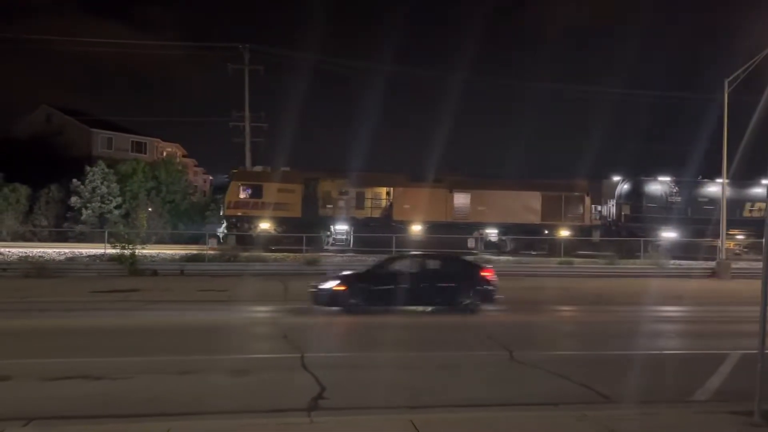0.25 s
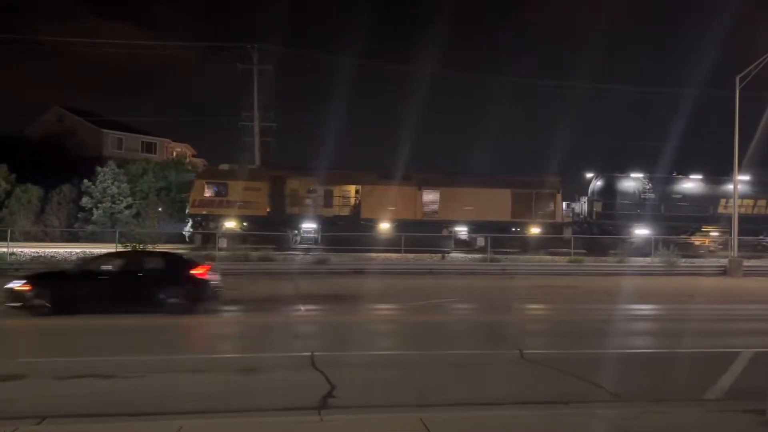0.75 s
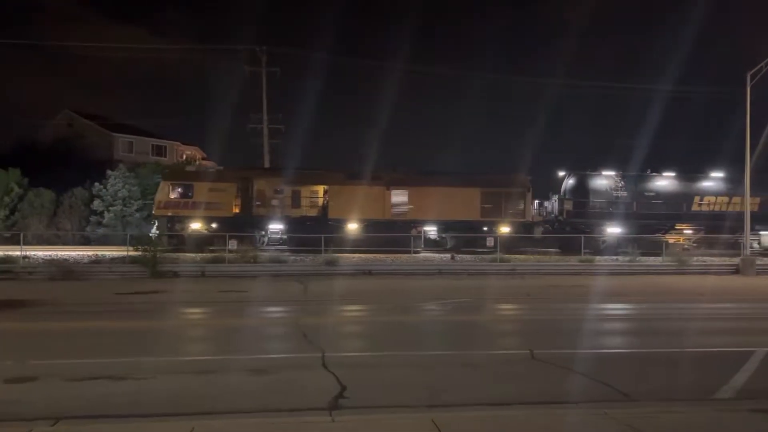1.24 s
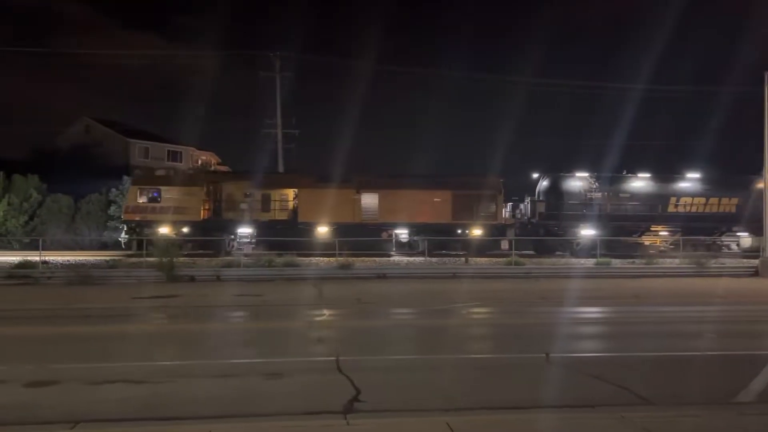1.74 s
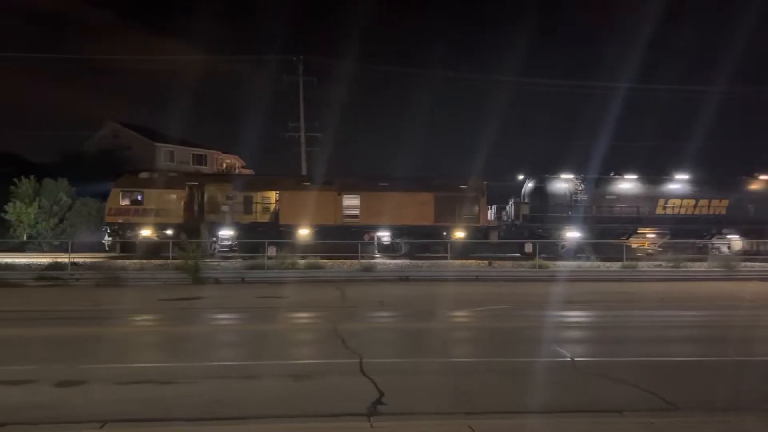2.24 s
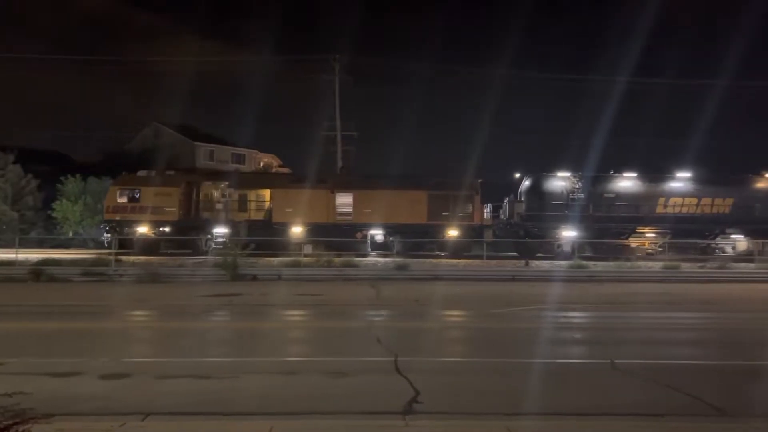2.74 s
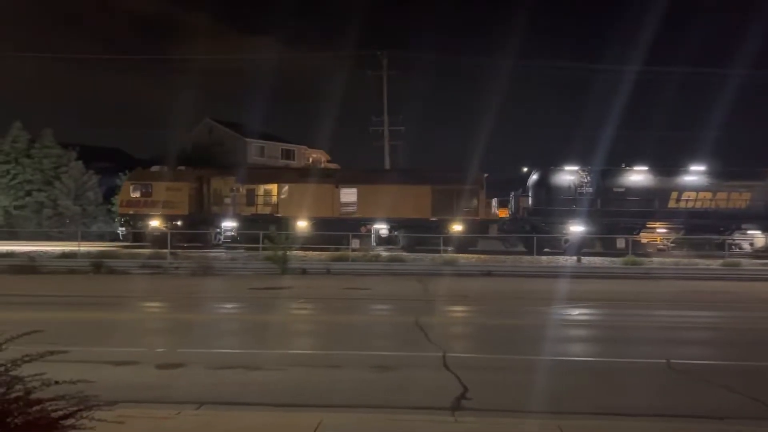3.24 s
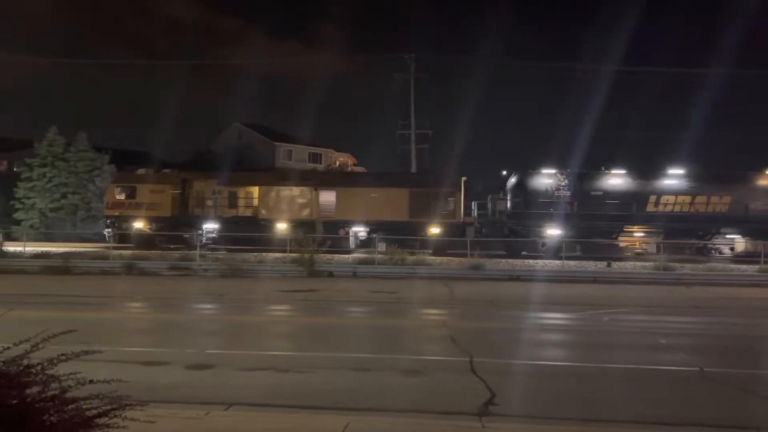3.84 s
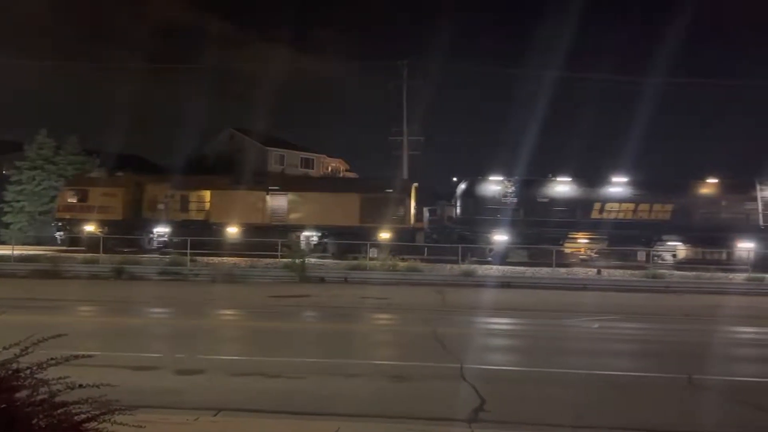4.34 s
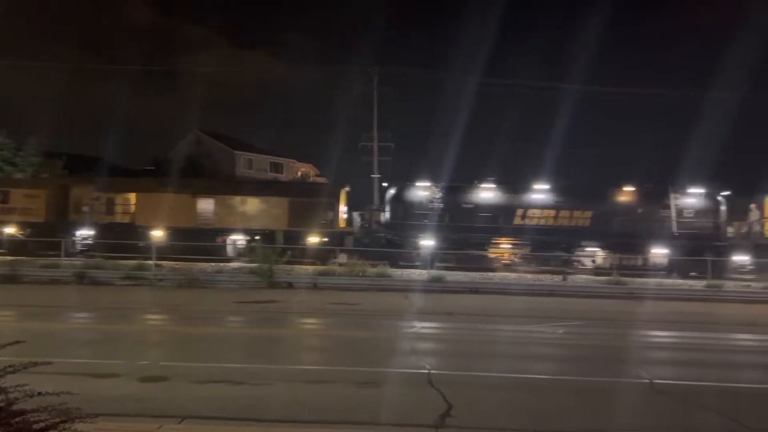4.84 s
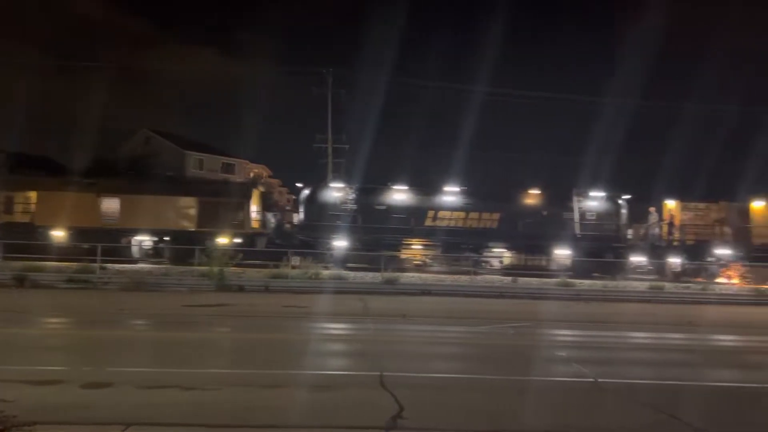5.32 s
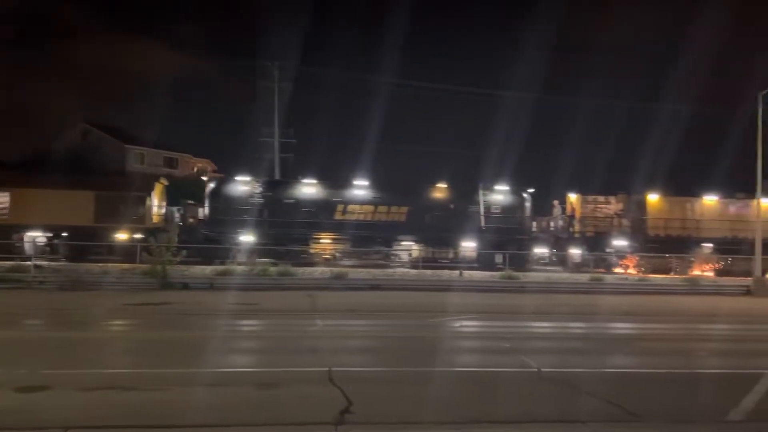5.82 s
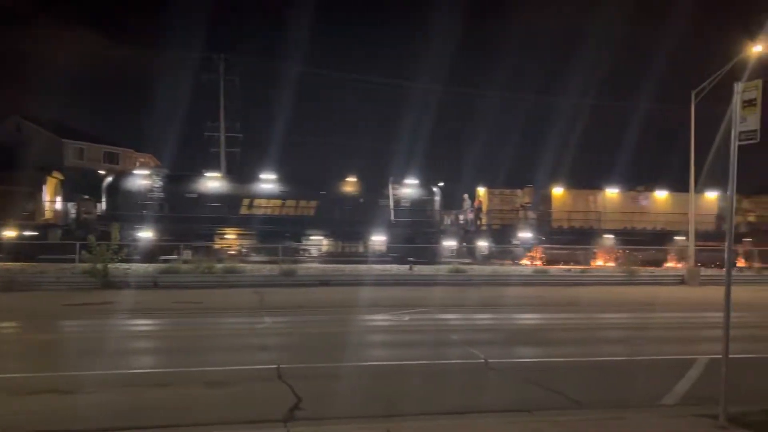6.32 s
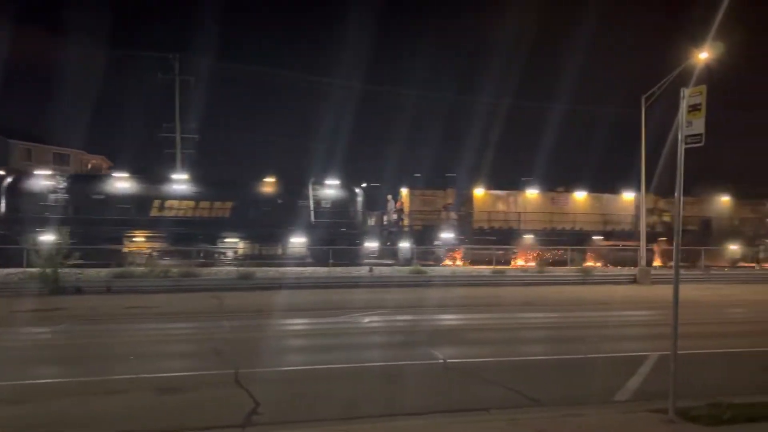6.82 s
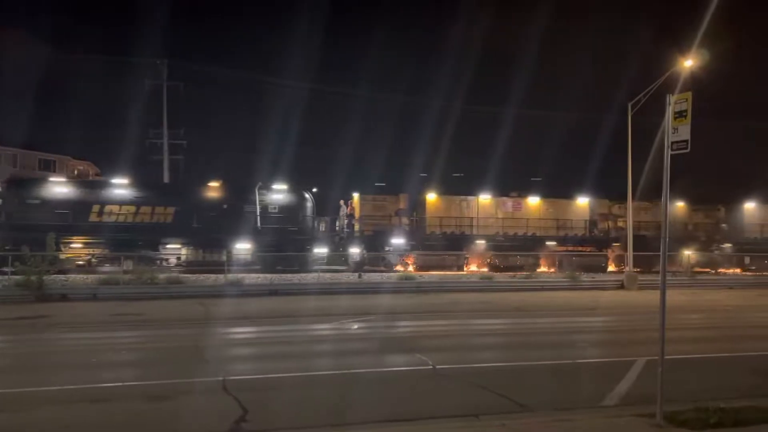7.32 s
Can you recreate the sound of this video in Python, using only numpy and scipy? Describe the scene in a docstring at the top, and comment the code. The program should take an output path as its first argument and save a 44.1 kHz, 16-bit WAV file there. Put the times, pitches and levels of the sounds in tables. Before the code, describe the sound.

Continuous loud machinery outdoors from a creeping rail grinding train: low buzzing engine hum that swells and dips, rushing broadband fan noise, and gritty steel grinding hiss with a faint mains-like buzz. A pulsing, slightly sinking gear whine sits inside the roar. The handheld stereo microphone across the road swings around after four seconds, moving fans leftward and bringing out brighter grinding, with fine hiss slowly growing to the end.

```python
"""Rail grinding train at night

A rail grinding train creeps past across a wide road from a small two-port microphone. Diesel sets drone
as wavering sines over uneven firing noise, under shaped-noise fan roar that drifts left as the microphone
turns. Stones hiss on the rails to the right as noise lines at their spin rate; a gear whine throbs."""
import sys
import numpy as np
from scipy import signal
from scipy.fft import rfft, irfft, next_fast_len
from scipy.io import wavfile
from scipy.ndimage import uniform_filter1d

SR = 44100
rng = np.random.default_rng(int(sys.argv[2]) if len(sys.argv) > 2 else 0)


def store_wav(level_fs):
    """Save 16-bit WAV to argv[1]."""
    pcm = np.round(np.clip(np.atleast_2d(level_fs), -1, 1) * 32767)
    wavfile.write(sys.argv[1], SR, pcm.T.astype(np.int16))


N = 333837
SIZE, HOP = 1024, 256  # short-time spectra, samples
HZ = np.fft.rfftfreq(SIZE, 1 / SR)[:, None]
FRAME_S = np.arange(N // HOP + 5) * HOP / SR
T_S = np.arange(N) / SR

# The microphone swings round between these times; every pair below is (before, after) the turn.
TURN_START_S, TURN_END_S = 4.08, 6.3

# Firing noise of the diesels: f/Hz, relative level/dB per Hz
RUMBLE_COLOUR = [(15, -43), (25, -25), (33, -21), (40, -10), (50, -4), (60, -13), (81, -4), (123, -7.5),
                 (160, -9), (180, -14), (216, -12), (313, -17), (340, -18.5), (385, -13.5), (479, -26.5),
                 (600, -24), (780, -57), (1320, -120)]
# Its left-right likeness: f/Hz, likeness/1
RUMBLE_LIKENESS = [(60, 0.99), (130, 0.93), (250, 0.99), (400, 0.6), (600, 0.9)]
# Share of the rumble that returns one firing cycle later: f/Hz, share/1
CYCLE_REPEAT_SHARE = [(40, .3), (70, .2), (100, .3), (200, .25), (450, .22), (700, .05)]
RUMBLE_DB = (-24, -23.5)
CYCLE_HZ = 15  # full firing cycles

# Strongest exhaust note: t/s, level/dB
DRONE_LEVEL = [(0.0, -13.5), (1.18, -15), (1.56, -22.5), (2.3, -17), (2.5, -18), (2.95, -21.5),
               (3.4, -17.5), (3.8, -16), (4.34, -21.5), (4.83, -17), (5.27, -19.5), (5.54, -25),
               (5.69, -20.5), (6.2, -23), (6.37, -34.5), (6.6, -31), (6.68, -24), (6.85, -21.5),
               (7.12, -17), (7.42, -28), (7.57, -39)]
# Its third multiple: t/s, level/dB
THIRD_LEVEL = [(0, -44.5), (.69, -29.5), (1.0, -39), (1.22, -30.5), (1.38, -44), (1.6, -30), (1.9, -33),
               (2.25, -35), (2.85, -39.5), (3.08, -29), (3.3, -25.5), (3.55, -29), (3.68, -40), (3.8, -28),
               (4.0, -32), (4.2, -48), (5.25, -32.5), (5.45, -24.5), (5.8, -29), (6.15, -43), (6.35, -28.5),
               (6.65, -36), (6.9, -35.5), (7.57, -33)]
DRONE_HZ, THIRD_HZ = 59.76, 179.3
# Exhaust notes above the strongest: f/Hz, usual level/dB
EXHAUST_NOTES = [(74.9, -28), (91, -31.5), (104.8, -32.5), (110.3, -31.5), (119.6, -31.5), (136, -39),
                 (240.4, -43.5), (254.5, -45.5), (300, -46), (316, -50.5), (359.6, -45)]
# Their swells and dips as the sets drift in and out of step: middle t/s, length/s, f/Hz, change/dB
EXHAUST_SWELLS = [(0.047, 0.29, 91, -3), (0.051, .3, 104, -17), (.05, .3, 120, -10),
                  (0.243, 0.49, 254.5, 10), (.4, 0.33, 91, 7.5), (.7, 0.36, 120, 1), (.5, 0.6, 75, 2),
                  (1.0, 0.46, 137, 6.5), (1.1, 1.5, 316, 13), (1.45, 0.28, 241, 8), (1.55, 0.13, 104, 8),
                  (1.8, 0.65, 91, 6), (1.9, 0.57, 75, 3), (2.103, 0.58, 360, 10), (2.4, 0.91, 104, 1.5),
                  (2.45, 0.43, 316, 11), (2.7, 0.55, 91, 8), (2.85, 0.45, 75, 7), (2.95, 0.27, 241, 11.5),
                  (3.298, 0.86, 360, 7), (3.5, 0.57, 120, 3), (3.6, 1.15, 110, 5.5), (3.797, 0.14, 104, 2),
                  (4.206, 0.49, 360, 8.5), (4.2, 0.36, 300, 9.5), (4.353, 0.78, 91, 8.5),
                  (4.396, 0.15, 75, -12), (4.446, 0.38, 241, 12.5), (4.49, 0.53, 137, 9),
                  (4.893, 0.17, 241, 13), (4.95, .2, 120, -18), (5.2, 0.72, 360, 6.5),
                  (5.7, 0.71, 120, 3.5), (5.8, 0.4, 91, 7), (5.832, 0.26, 241, 12.5),
                  (6.003, 0.85, 137, 7.5), (6.102, 0.11, 75, -12), (6.104, 0.54, 360, 9.5),
                  (6.5, 2.9, 254.5, 9), (6.75, 0.3, 300, 13), (6.8, 0.73, 91, 9.5), (6.898, .35, 75, -12),
                  (7.103, 0.66, 360, 7), (7.15, 0.22, 241, 13.5), (7.397, 0.36, 104, -6),
                  (7.502, 0.36, 91, -17), (7.3, 0.79, 75, 6), (7.45, .4, 120, 3), (7.45, 0.46, 137, 11)]
# Fainter notes of engines and generators: f/Hz, level/dB
FAINT_NOTES = [(44.6, -43), (150.7, -41.5), (209.9, -48), (224.8, -50), (270.5, -44.5), (405.1, -40.5),
               (470.4, -49.5)]
# Gear and motor notes from nearly straight ahead: f/Hz, level before tilt/dB
GEAR_NOTES = [(598.2, -50), (720, -47), (781.3, -48), (808, -49), (840, -50), (1120, -53), (1228, -50),
              (1260, -47), (1381, -46), (1608, -51), (1690, -50), (1715, -49), (1979, -52), (2342, -47),
              (2575, -51), (3067, -55), (4318, -57), (5836, -62), (6440, -61), (6560, -60)]
GEAR_TILT_DB_PER_OCTAVE = (-.5, 2.)

# Gear whine: t/s, level before throb/dB
WHINE_LEVEL = [(0, -45), (.3, -58), (.45, -37), (3.1, -35), (3.27, -44), (3.44, -36), (3.8, -42),
               (4.0, -61), (4.7, -49), (4.9, -43), (5.7, -43), (6.1, -56), (7.1, -42), (7.36, -44),
               (7.57, -46)]
# Unsteady tone just above it: t/s, level/dB
UPPER_TONE_LEVEL = [(0, -51), (1.1, -45), (1.6, -42), (2.5, -43), (3.2, -44), (3.8, -47), (4.1, -46),
                    (4.85, -39), (5.4, -44.5), (6.1, -41), (6.5, -48), (7.57, -44)]
WHINE_HZ, WHINE_SINK_HZ_PER_S, UPPER_TONE_HZ = 919, 1.4, 998  # sinks as its car draws level
THROB_HZ, THROB_START_S = 5.09, 1.05

# Fan roar at the right port: f/Hz, relative level/dB per Hz
FAN_COLOUR = [(300, -18), (400, -20), (520, -13.5), (700, -1), (1000, -6), (1500, -11.5), (2000, -10),
              (2400, -4), (2900, -8), (3500, -13), (4600, -22), (6300, -19.3), (6900, -28.6), (7600, -29.4)]
# Fans, left minus right, shaded by the microphone body: f/Hz, difference/dB
FAN_SHADE = [(300, -4), (400, -12), (520, -25), (700, -4.5), (1000, -3.5), (1500, -4), (2000, -2),
             (2400, -2.5), (2900, -3), (3500, -7), (4600, -14), (6300, -6.5), (6900, 2.0), (7600, 0.5)]
FAN_DB, FAN_LAG_SAMPLES = (-24.5, -23), (4.3, -9.5)  # lag: left port late
FAN_START_DB, FAN_RISE_S = -4.5, 0.45  # softer at first

# Finest hiss of the stones: f/Hz, relative level/dB per Hz
FIZZ_COLOUR = [(7000, -29.5), (7500, -23.5), (8000, -31.5), (9000, -26), (9800, -29.5), (11400, -27.5),
               (12300, -34), (13700, -32.5), (14500, -44), (15600, -34.5)]
# Its phase, left against right: f/Hz, phase/rad
FIZZ_PHASE = [(7000, -3.1), (7500, -2), (8200, 0), (9000, 0), (9700, 3.14), (10900, 3.14), (11750, 6.28),
              (13000, 6.28), (13600, 9.42), (14200, 9.42), (15200, 12.57)]
# Its left-right likeness: f/Hz, likeness/1
FIZZ_LIKENESS = [(7000, .6), (7700, .8), (8300, .97), (13000, .97), (14000, .85), (15000, .95)]
FIZZ_DB, FIZZ_GROWTH_DB_PER_S = -43.5, 0.61

# Stones on steel at the right port: f/Hz, relative level before tilt/dB per Hz
STONE_COLOUR = [(300, -8.5), (400, -12), (520, -11), (700, -13), (1000, -5), (1500, -11.5), (2000, -9.5),
                (2400, -13.5), (2900, -12), (3500, -10), (4600, -10), (6300, -11), (6900, -18), (7600, -13)]
# Stones and notes, left minus right, shaded by the microphone body: f/Hz, difference/dB
BODY_SHADE = [(300, 0.5), (400, 1.5), (520, -6), (700, -1), (1000, -1.5), (1500, 0), (2000, -3), (2400, 6),
              (2900, 0.5), (3500, -1), (4600, -12), (6300, -11), (6900, 8.5), (7600, 13.5)]
STONE_DB, STONE_TILT_DB_PER_OCTAVE = (-24, -23.5), (-2.5, -0.64)
STONE_LAG_SAMPLES = 19.35  # left port late

# Roar bands that stand out or sink as the cars move past:
# middle t/s, length/s, f/Hz, climb/Hz per s, width/Hz, lift/dB
RING_BANDS = [(0.27, 1.26, 2360, -40, 320, 8), (2.2, 4.2, 2090, 1, 420, 3), (3.9, 1.2, 2470, 20, 200, 2.5),
              (5.96, 0.48, 2440, 40, 190, 5), (6.84, 2.4, 2490, 38, 180, 5), (1.6, 0.89, 2340, -40, 290, 3),
              (3.7, 0.74, 2270, 1, 120, 4.5), (5.1, 0.73, 1690, 32.5, 39, 5), (3.3, 1.1, 1680, 1, 66, 6),
              (5.56, 0.28, 810, 3, 110, 8.5), (7.5, 1.4, 2250, 1, 440, 1), (6.3, 0.46, 790, 1, 81, 2.5),
              (2.2, 3.3, 1630, 5, 140, 4), (4.9, 1.7, 1660, 36, 79, 9.5), (6.45, 1.25, 1860, 152, 350, 6.5),
              (0.48, 0.7, 870, 1, 61, 6.5), (1.5, 3.6, 740, -5, 190, 1), (6.6, 0.8, 870, 1, 160, 2),
              (6.2, 1.9, 1104, 8, 64, 4.5), (2.7, 4.3, 1300, 8, 200, 6), (6, 2.9, 4400, 1, 190, 4),
              (5.7, 2.8, 6500, 1, 330, 4.5), (4.3, 7.2, 6500, 1, 230, 2.5), (2.07, 1.2, 6900, 1, 3600, 3),
              (2.5, 1.3, 4540, 1, 260, 4.5), (2.6, 3.3, 3360, 7, 260, -5), (4.6, 3.6, 2170, 1, 100, 1),
              (.5, 1.6, 1940, -20, 110, 5.5), (.6, 0.53, 1240, 1, 79, 4.5), (2.8, 1.8, 2740, 40, 180, 1.5),
              (7.8, 0.73, 2100, 1, 120, 6), (5.3, 1.6, 1410, 40, 190, 5.5), (2.9, 4.2, 2856, 3, 145, -8.5),
              (7.2, 3.6, 2990, 1, 110, 3.5), (6.4, 1.7, 5500, 1, 820, 2), (7, 2.6, 6700, 1, 260, -5)]
# Share of the lift in dB that reaches the left port: f/Hz, share/1
RING_LEFT_SHARE = [(900, 1), (1300, 0.64), (1700, 0.42), (2400, 0.61), (4400, 0.86), (6500, 0.98)]
HOLLOW_HZ, HOLLOW_CLIMB_S, HOLLOW_CLIMB_HZ_PER_S = 1500, 5.3, 80  # echo dip, slides up late on
HOLLOW_DB, BELOW_DB = (-1, -6.5), (-4.5, -1)  # depth of that dip, and of the one below it
STRAND_DB = 2.3
# Share of stones and fans that returns one rotor turn later: f/Hz, share/1
SPIN_REPEAT_SHARE = [(400, .15), (1000, .12), (1500, .18), (2500, .2), (3000, .14), (4000, .1), (5000, .03),
                     (7000, .02)]
SPIN_HZ = 60  # stones and their motors

SKIP_S, SKIP_LENGTH_S = 2.36, 0.00757
EDGE_HZ = 15760


def amp(db):
    """dB to gain."""
    return np.exp(np.asarray(db) * (np.log(10) / 20))


def evened(x):
    """Scales to rms 1."""
    return x / np.sqrt(np.mean(x ** 2) + 1e-20)


def read(points, hz=HZ):
    """Interpolates a table over log frequency, ends held."""
    f, value = np.transpose(points)
    return np.interp(np.log(hz + 1), np.log(f + 1), value)


def level_at_frames(rows):
    """Level in dB, interpolated frame by frame."""
    t_s, level_db = np.transpose(rows)
    return np.interp(FRAME_S, t_s, level_db)


def hump(x, middle, width):
    """A flat-topped bump of height 1."""
    return 1 / (1 + np.square(np.square(2 * (x - middle) / width)))


def turned(pair, t_s):
    """Eases from the value before the turn to the value after it."""
    share = np.clip((t_s - TURN_START_S) / (TURN_END_S - TURN_START_S), 0, 1)
    return pair[0] + (pair[1] - pair[0]) * np.sin(np.pi / 2 * share) ** 2


def wander(top_hz):
    """Random-phase sum of sines up to top_hz, rms 1, frame by frame."""
    f = np.geomspace(top_hz / 20, top_hz, 16)[:, None]
    phase = rng.random((16, 1))
    waves = np.sin(2 * np.pi * (f * FRAME_S + phase)) / np.sqrt(f)
    return evened(waves.sum(0))


def lag_phase(lag_samples):
    """Phase in rad of a delay at the left port."""
    return -2 * np.pi * HZ * lag_samples / SR


def noise(colour_db, shade_db, likeness, phase, patchy_db):
    """Patchy random short-time spectra at two ports, rms 1 on the right."""
    a, b, c, d, patches = rng.standard_normal((len(FRAME_S), len(HZ), 5)).T
    patches = uniform_filter1d(patches, size=10, axis=0)
    patches = evened(uniform_filter1d(patches, size=16, axis=1))
    likeness = np.clip(likeness, 0, 1)
    right = a + 1j * b
    left = likeness * right + np.sqrt(1 - likeness ** 2) * (c + 1j * d)
    left = left * amp(shade_db) * np.exp(1j * phase)
    spectra = np.array([left, right]) * amp(colour_db + patchy_db * patches)
    out = signal.istft(spectra, nperseg=SIZE, noverlap=SIZE - HOP)[1][:, :N]
    return out / np.sqrt(np.mean(out[1] ** 2))


def band(lo_hz, hi_hz):
    """Steep skirts in dB outside a band."""
    low_skirt_db = -60 * np.log10(1 + (lo_hz / (HZ + 1)) ** 8) / 8
    return low_skirt_db - 20 * np.log10(1 + (HZ / hi_hz) ** 20)


def note(hz, db, waver_db, drift_hz, lag_samples):
    """A sine of nominal rms level db, wavering in level and pitch; the left port hears it late."""
    pitch_hz = np.interp(T_S, FRAME_S, hz + drift_hz * wander(top_hz=4))
    turns = np.cumsum(pitch_hz) / SR + rng.random()
    gain = np.interp(T_S, FRAME_S, np.sqrt(2) * amp(db + waver_db * wander(top_hz=9)))
    late_turns = np.array([[lag_samples], [0]]) * np.mean(hz) / SR
    shade_db = read(BODY_SHADE, np.mean(hz)) * np.array([[.5], [-.5]])
    return gain * np.sin(2 * np.pi * (turns - late_turns)) * amp(shade_db)


def spun(x, turn_hz, repeat):
    """Each turn or cycle partly repeats the last: fuzzy lines at every multiple of turn_hz."""
    size = next_fast_len(N + SR // 2)
    hz = np.fft.rfftfreq(size, 1 / SR)
    share = np.clip(read(repeat, hz), 0, .9)
    one_turn_late = np.exp(-2j * np.pi * hz / turn_hz)
    comb = np.sqrt(1 - share ** 2) / (1 - share * one_turn_late)
    return irfft(rfft(x, size) * comb, size)[:, :N]


def ring_db():
    """Lift and dips of the roar spectrum from ringing bands and echoes, frame by frame."""
    bands = []
    for s, length, hz, climb, width, db in RING_BANDS:
        bands.append((hz + climb * (FRAME_S - s), width, db * hump(FRAME_S, s, length)))
    hollow_hz = HOLLOW_HZ + HOLLOW_CLIMB_HZ_PER_S * np.maximum(FRAME_S - HOLLOW_CLIMB_S, 0)
    hollow_db, below_db = turned(HOLLOW_DB, FRAME_S), turned(BELOW_DB, FRAME_S)
    dips = [(.76, below_db), (1, hollow_db), (1.37, 0.35 * hollow_db), (1.78, 0.43 * hollow_db)]
    bands += [(ratio * hollow_hz, 150., db) for ratio, db in dips]
    low = HZ[:SIZE // 5]  # no lift above these bins
    lift_db = sum(db * hump(low, hz, width) for hz, width, db in bands)
    return np.pad(lift_db, ((0, len(HZ) - len(low)), (0, 0)))


def strands():
    """Thin short-lived strands in dB, one bin wide, as narrow resonances come and go."""
    field = rng.standard_normal((len(FRAME_S), len(HZ))).T
    for _ in range(2):
        field = uniform_filter1d(field, size=20, axis=1)
    return STRAND_DB * evened(field)


def rumble():
    """Uneven firing, partly alike from cycle to cycle, gathers loosely round the exhaust notes."""
    sound = noise(read(RUMBLE_COLOUR), .9, read(RUMBLE_LIKENESS), lag_phase(17), patchy_db=.4)
    return amp(turned(RUMBLE_DB, T_S)) * spun(sound, CYCLE_HZ, CYCLE_REPEAT_SHARE)


def engines():
    """Exhaust orders, fainter engine and generator notes, and gear notes, each a wavering sine."""
    out = note(DRONE_HZ, level_at_frames(DRONE_LEVEL), waver_db=-0.5, drift_hz=0.04, lag_samples=4.7)
    out += note(THIRD_HZ, level_at_frames(THIRD_LEVEL), waver_db=0.5, drift_hz=0.31, lag_samples=13.0)
    for hz, db in EXHAUST_NOTES:
        mine = [row for row in EXHAUST_SWELLS if abs(row[2] / hz - 1) < .025]
        swell_db = sum(change_db * hump(FRAME_S, s, length) for s, length, _, change_db in mine)
        out += note(hz, db + swell_db, waver_db=1.6, drift_hz=0.7, lag_samples=13.0)
    for hz, db in FAINT_NOTES:
        out += note(hz, db, waver_db=3.0, drift_hz=0.0026 * hz, lag_samples=29.0)
    for hz, db in GEAR_NOTES:
        tilt_db = turned(GEAR_TILT_DB_PER_OCTAVE, FRAME_S) * np.log2(hz / 2500)
        out += note(hz, db + tilt_db, waver_db=3.0, drift_hz=0.1094 * np.sqrt(hz), lag_samples=1.7)
    return out


def whine():
    """A gear tone that beats against a near neighbour, strong and weak throbs in turn, and the tone above."""
    angle = 2 * np.pi * THROB_HZ * (T_S - THROB_START_S)
    throb = 1 + .5 * np.cos(angle) + .18 * np.cos(angle / 2)
    pitch_hz = WHINE_HZ - WHINE_SINK_HZ_PER_S * FRAME_S
    gear = note(pitch_hz, level_at_frames(WHINE_LEVEL), waver_db=1.5, drift_hz=2.2, lag_samples=6.0)
    upper_db = level_at_frames(UPPER_TONE_LEVEL) + 3.0 * wander(top_hz=29.96)
    upper = note(UPPER_TONE_HZ, upper_db, waver_db=1.2, drift_hz=3.2, lag_samples=4.6)
    return upper + throb * gear


def fans(lift_db):
    """Broad roar whose arrival gap between the ports changes with the bearing."""
    colour_db = read(FAN_COLOUR) + lift_db + band(310, 4100)
    shade_db = read(FAN_SHADE) + (read(RING_LEFT_SHARE) - 1) * lift_db
    phase = lag_phase(turned(FAN_LAG_SAMPLES, FRAME_S)) + 0.47
    sound = noise(colour_db, shade_db, 0.82, phase, patchy_db=0.7)
    start_db = FAN_START_DB * np.clip(1 - T_S / FAN_RISE_S, 0, 1)
    return amp(turned(FAN_DB, T_S) + start_db) * sound


def fizz():
    """Top hiss above 7 kHz, closely alike left and right, with bands alternating in and out of phase between
    the channels; grows slowly."""
    colour_db = read(FIZZ_COLOUR) + band(5000, 18000)
    sound = noise(colour_db, 0.089, read(FIZZ_LIKENESS), read(FIZZ_PHASE), patchy_db=1.36)
    return amp(FIZZ_DB + FIZZ_GROWTH_DB_PER_S * T_S) * sound


def stones(lift_db):
    """Many stones blend to dense noise, brighter as they come into view."""
    tilt_db = turned(STONE_TILT_DB_PER_OCTAVE, FRAME_S) * np.log2((HZ + 1) / 2000)
    colour_db = read(STONE_COLOUR) + tilt_db + lift_db + band(360, 6556)
    shade_db = read(BODY_SHADE) + (read(RING_LEFT_SHARE) - 1) * lift_db
    phase = lag_phase(STONE_LAG_SAMPLES) - .3
    sound = noise(colour_db, shade_db, 0.58, phase, patchy_db=0.45)
    return amp(turned(STONE_DB, T_S)) * sound


def scene():
    """All sources at the two ports, left then right."""
    lift_db = ring_db() + strands()
    background = rumble() + engines() + whine()
    roar = spun(fans(lift_db) + stones(lift_db), SPIN_HZ, SPIN_REPEAT_SHARE)
    return background + roar + fizz()


def record(dry):
    """Bass cut, one stumble that repeats a few milliseconds, then band limit."""
    late = np.roll(dry, round(SKIP_LENGTH_S * SR), axis=1)
    cut = signal.butter(4, 38., "highpass", fs=SR, output="sos")
    fade = np.clip((T_S - SKIP_S) / 0.0019, 0, 1)
    joined = (1 - fade) * signal.sosfilt(cut, dry) + fade * signal.sosfilt(cut, late)
    lowpass = signal.firwin(1501, EDGE_HZ, window=("kaiser", 9), fs=SR)
    return signal.oaconvolve(joined, lowpass[None], "same")


dry = scene()
out = record(dry)
store_wav(out)
```